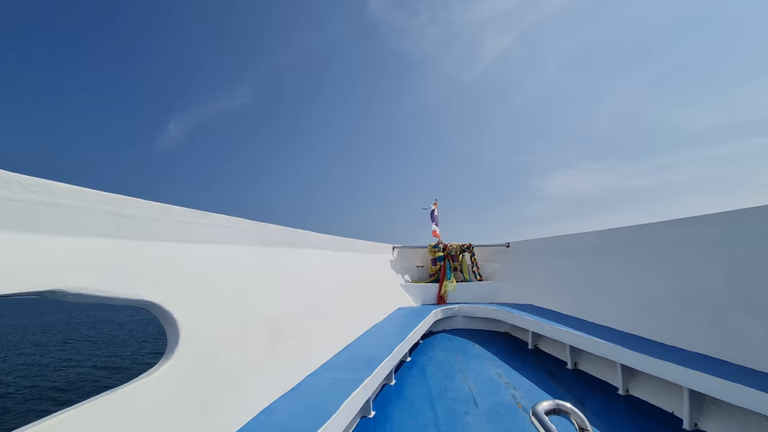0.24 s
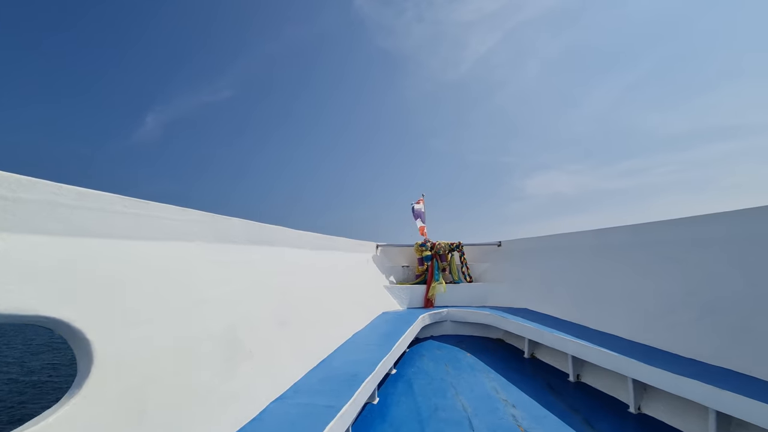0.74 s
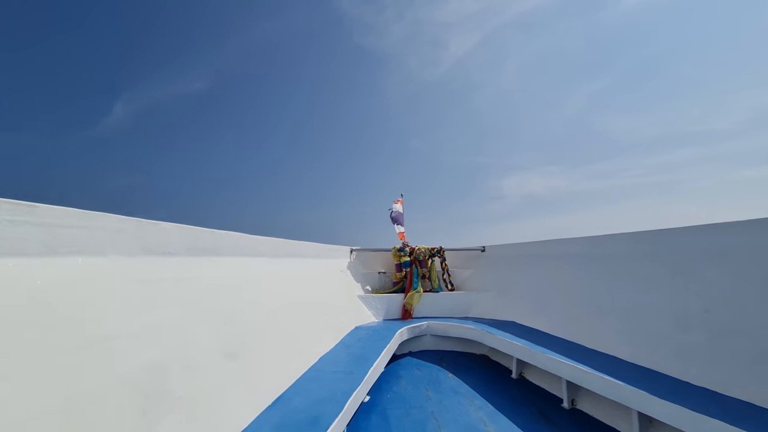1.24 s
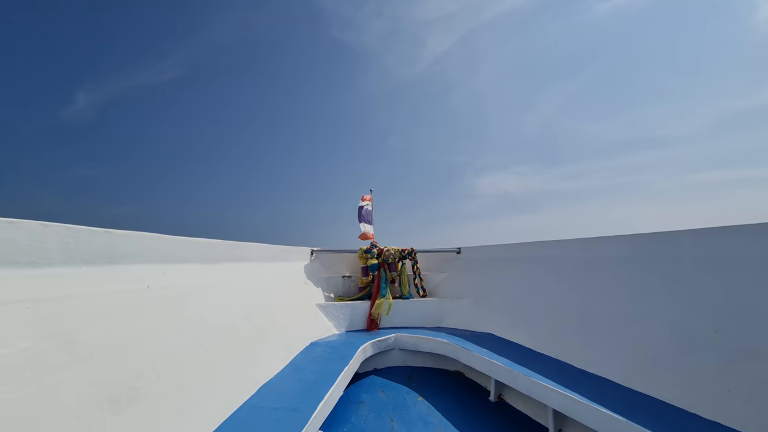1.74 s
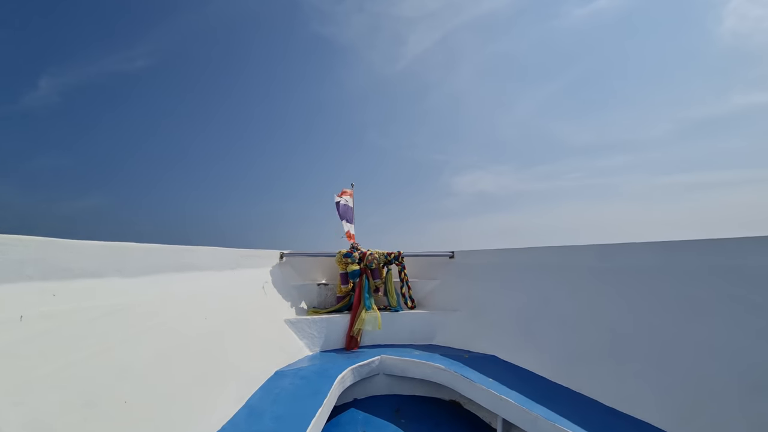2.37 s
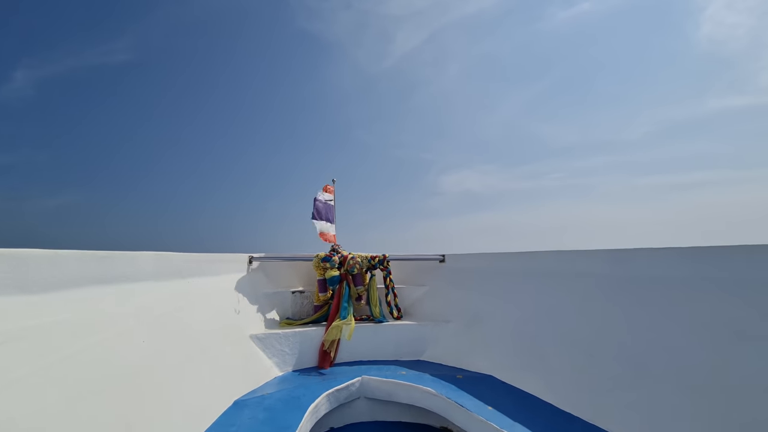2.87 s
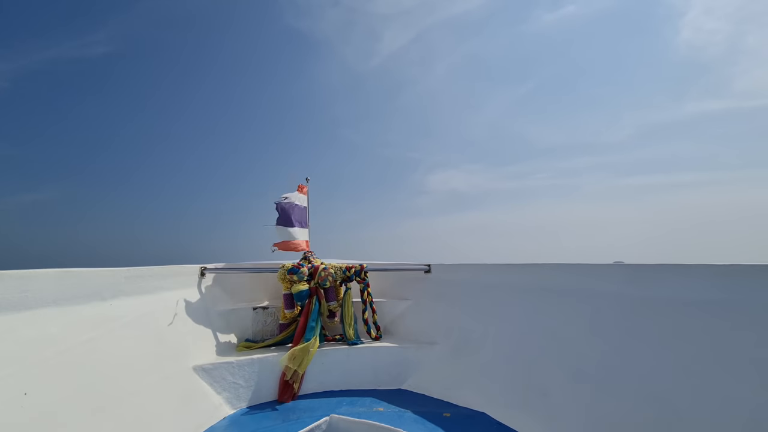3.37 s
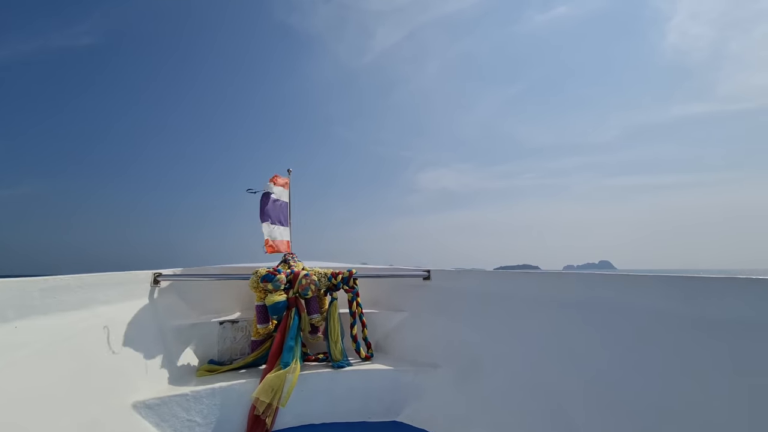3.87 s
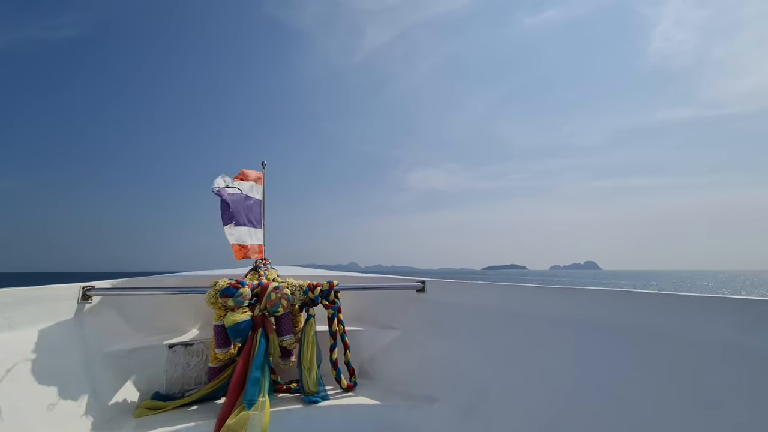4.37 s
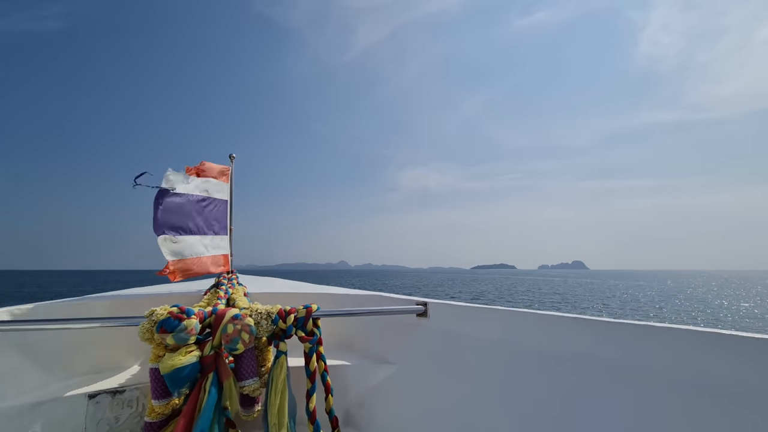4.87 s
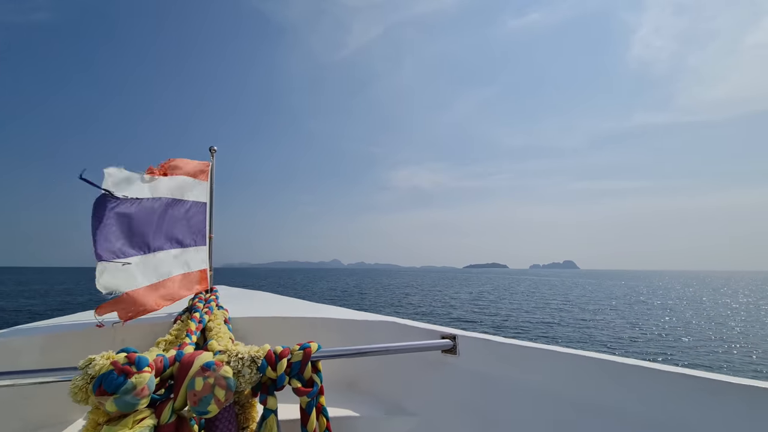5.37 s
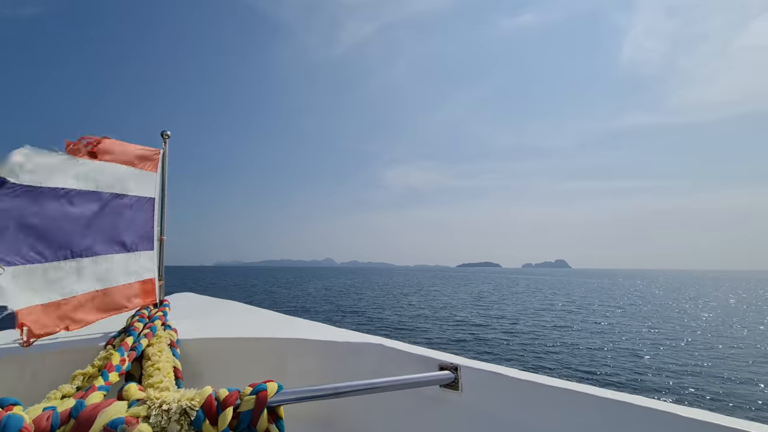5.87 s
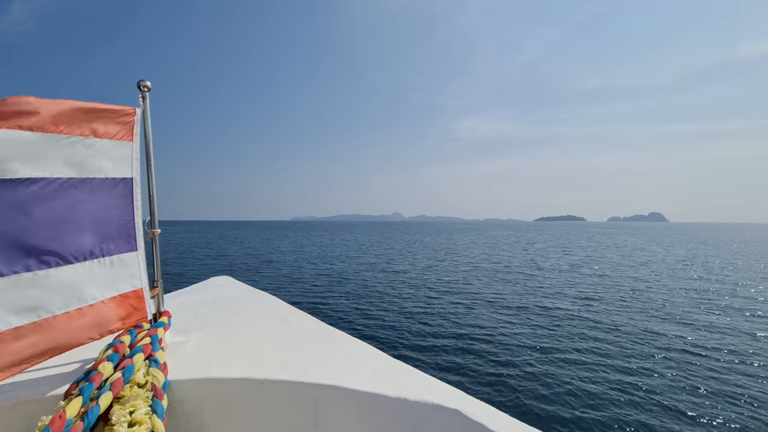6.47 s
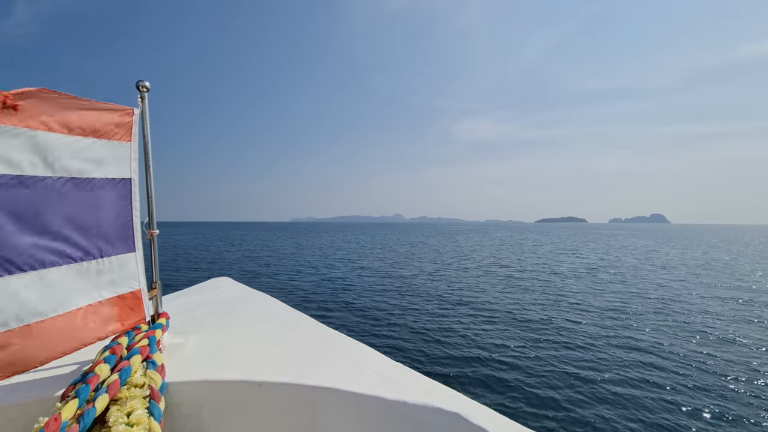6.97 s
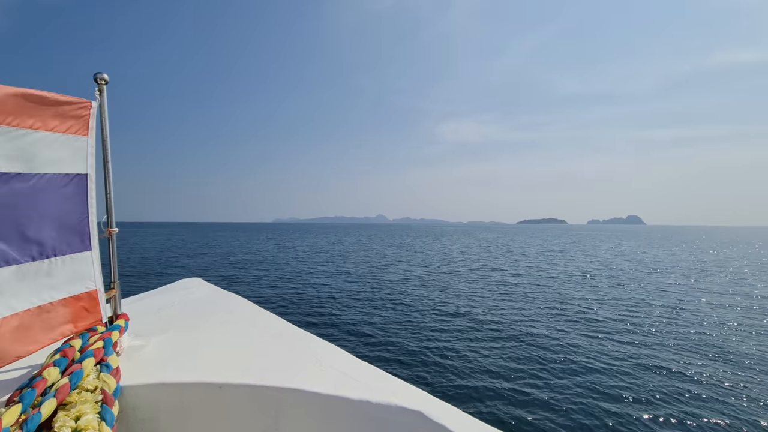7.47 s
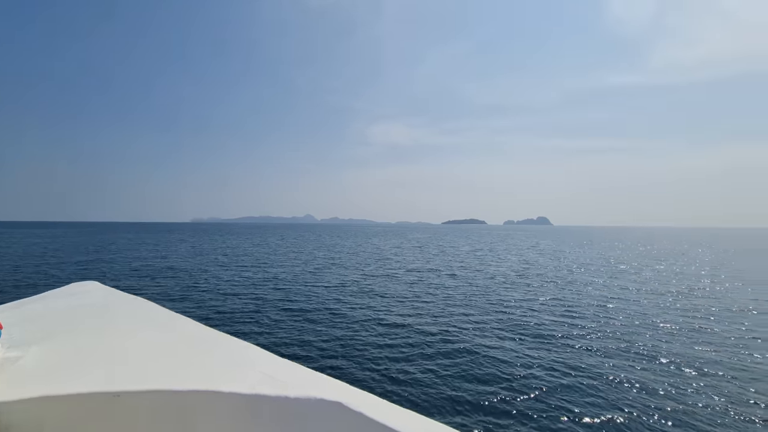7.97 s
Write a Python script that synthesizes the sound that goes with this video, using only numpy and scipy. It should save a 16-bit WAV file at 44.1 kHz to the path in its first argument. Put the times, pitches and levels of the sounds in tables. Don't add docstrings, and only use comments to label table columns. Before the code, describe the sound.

A handheld stereo microphone is carried forward along an open ferry bow. From 0 to 0.2 s wind pounds it in rough, popping thuds, uneven between left and right. Deep diesel drone continues throughout, several close tones beating and swelling, strong around 0.9 s and again from 3.8 to 5.2 s, with hull rumble and a faint high rail tone. Below, the bow wave hisses softly in surges, brighter near 2.4 s. Wind returns at 2.2 to 2.8 s, hardest at about 2.7 on the left, with another knock at 3.2. From 2.9 s a torn flag begins snapping: sharp, dry cracks and slaps, sparse then denser, especially 5 to 6.2 s, a few ringing briefly. Softer buffets pass at 4.3 and 5.3 s. At 6.3 s a bare cut jumps back to the 3.5 s passage, repeating drone, wash and flapping until about 8 s.

```python
import sys
import numpy as np
from scipy import signal
from scipy.fft import rfft, irfft, next_fast_len
from scipy.io import wavfile
from scipy.ndimage import uniform_filter1d

SR = 44100
rng = np.random.default_rng(int(sys.argv[2]) if len(sys.argv) > 2 else 0)


def unload_audio(sound):
    columns = np.transpose(np.atleast_2d(sound))
    steps = np.round(np.clip(columns, -1, 1) * 32767)
    wavfile.write(sys.argv[1], SR, steps.astype(np.int16))


def amplitude_ratio(level_db):
    exponent = np.asarray(level_db, float) / 20
    return 10 ** exponent


N = 362943
CUT, LOOP = 279869, 123480

CYCLE_HZ = [8.688, 8.918, 9.233]
LEADS = [
    (0, 6),
    (0, 9),
    (1, 12),
    (2, 38),
]
WEAK_ORDERS = [(2, 4, 0), (2, 6, 0), (0, 7, 0), (0, 8, 1), (1, 8, 1), (2, 9, 1), (0, 10, 1), (0, 11, 2),
               (1, 13, 2), (2, 14, 2), (1, 15, 2), (1, 18, 3), (2, 18, 3), (0, 21, 3), (2, 21, 3),
               (1, 24, 3), (2, 25, 3), (0, 43, 3), (0, 44, 3), (0, 45, 3), (1, 46, 3)]
WEAK_ORDERS_DB = [-25, -6.5, -21.5, -20, -4, -3, -30, -15.5, -16.5, -29.5, -47, -6.5, -4.5, -6.5, -12.5,
                  -6.5, -9, -5.5, -13, -8.5, -6.5]
# t/s, length/s, engine, order, level/dB
RESONANT_SPOTS = [(0.887, 0.14, 1, 46, -30), (1.26, 0.19, 2, 59, -38.5), (1.28, 0.52, 2, 12, -33),
                  (2.1, 0.2, 2, 18, -27.5), (4.4, 1.6, 2, 25, -43.5), (5.05, 0.24, 1, 32, -35),
                  (3.3, 4.3, 1, 135, -60), (4.82, 0.24, 2, 18, -26.5), (4.32, 0.028, 2, 30, -29),
                  (3.72, 0.072, 2, 23, -32), (3.75, 0.14, 1, 46, -33), (4.85, 0.37, 1, 46, -36.5),
                  (6.1, 0.31, 0, 44, -38), (5.33, 0.054, 1, 27, -33.5), (5.36, 0.055, 0, 44, -27),
                  (5.17, 0.11, 1, 33, -32), (4.8, 0.12, 2, 18, -37), (3.4, 0.79, 2, 18, -34.5),
                  (4.7, 0.17, 2, 31, -39.5)]


def engines():
    clock = np.arange(N // 16 + 1) * 16 / SR
    t = clock - CUT / SR
    boom_db = boom(clock)
    calm_db = uniform_filter1d(boom_db, size=SR // 32, axis=1)
    boom_db[3] = uniform_filter1d(boom_db[3], size=SR // 96)
    drift = evened(uniform_filter1d(rng.standard_normal((len(t), 2)), size=1400, axis=0)).T
    out = np.zeros((2, len(t)))
    for (engine, order), db in zip(LEADS, boom_db):
        hz = order * CYCLE_HZ[engine]
        shift = .1 + .0016 * hz
        out += amplitude_ratio(db - 1.5) * np.cos(2 * np.pi * hz * t + shift * drift)

    waver_db = 4
    hunt_turns = 0.11
    for (engine, order, lead), db in zip(WEAK_ORDERS, WEAK_ORDERS_DB):
        waver, bend = wander(len(t), 300), wander(len(t), 400)
        turns = order * CYCLE_HZ[engine] * t + rng.random() + hunt_turns * bend
        level = amplitude_ratio(calm_db[lead] + db + waver_db * waver)
        out += level * np.cos(2 * np.pi * turns + 0.35 * drift)

    blur = .012
    for s, length, engine, order, db in RESONANT_SPOTS:
        swell = np.exp(-(2 * (clock - s) / length) ** 2)
        phase = 2 * np.pi * order * CYCLE_HZ[engine] * t + blur * order * drift.sum(0)
        out += amplitude_ratio(db) * swell * np.cos(phase + 0.27 * drift)
    return np.sqrt(2) * signal.resample_poly(out, 16, 1, axis=1)[:, :N]


# t/s, level/dB
DRONE = [(0, -30.5), (.35, -24), (.6, -20.5), (.87, -15), (1.15, -18), (1.5, -31.5), (1.9, -22),
         (2.3, -23.5), (2.66, -24), (3.1, -19.5), (3.5, -24), (3.8, -13), (4.15, -13.5), (4.7, -15),
         (5.15, -15.5), (5.5, -24), (5.85, -18), (6.33, -20.5)]
LEAD_DB = [-4.5, -5, 0, -21]
LEAD_SHARE = [0.82, 0.67, 1, 0.085]
# t/s, length/s, depth level/dB
DUCKS = [(.22, 0.073, 9.5), (.73, 0.18, 13), (1.03, 0.14, 33.5), (1.72, 0.093, 10.5), (1.42, .06, -0.5),
         (2.07, 0.038, 22.5), (2.55, 0.054, 3.5), (3.02, 0.044, 5), (5.31, 0.054, 12), (2.2, 0.044, 14),
         (2.44, 0.21, 18.5), (2.87, 0.19, 29), (3.26, 0.066, 26.5), (4.32, 0.25, 9), (5.3, 0.16, 9),
         (5.67, 0.077, 13), (6.18, 0.16, 9)]
# t/s, length/s, level/dB
PANELS = [
    [(.4, 0.23, -12.5), (.64, 0.25, 8), (.9, 0.21, 5.5), (1.17, 0.14, -7.5), (1.56, 0.1, 16.5),
     (2.0, 0.27, -8), (2.8, 2.1, -12), (4.06, 0.04, -4), (4.68, 0.15, -10.5), (5.1, 0.26, 7.5),
     (5.75, 0.27, 11), (5.95, 0.094, -9), (6.3, 0.086, -13)],
    [(.4, 0.31, -5), (.64, 0.042, 14.5), (1.3, 0.25, 8), (1.91, 0.069, 13.5), (2.3, .2, -0.5),
     (3.14, 0.052, 9.5), (3.5, 0.27, -14), (3.88, 0.14, -19.5), (4.19, 0.092, 9.5), (4.4, 0.19, -36),
     (4.81, 0.031, -18.5), (5.58, 0.18, 13.5), (5.84, 0.039, 9.5), (5.93, 0.11, 10.5), (6.27, 0.056, -1)],
    [(.35, 0.027, 13), (.5, 0.018, -14), (.88, 0.058, 0.5), (1.15, 0.19, 3), (1.95, 0.084, -12),
     (2.3, 0.11, 8), (3.15, 0.068, 2.5), (3.91, 0.076, -3.5), (4.13, 0.12, 4), (5.55, .2, 2.5),
     (5.93, 0.079, -2), (6.32, 0.081, 9.5)],
]
# t/s, length/s, level/dB
RAIL = [
    (.3, 0.25, 4),
    (1.5, 0.16, -2),
    (2.037, 0.35, 3),
    (3.514, 0.13, -32),
    (4.12, 0.53, 7),
    (4.93, 0.47, 7),
    (5.495, 0.17, -3.5),
    (5.875, 0.38, 7.5),
]


def boom(t):
    middle_db = -18
    drone_db = columns(DRONE, t)[0] - middle_db
    ducks_db = bumps(DUCKS, t)
    return np.array([middle_db + db + share * (drone_db - ducks_db) + bumps(panels, t)
                     for db, share, panels in zip(LEAD_DB, LEAD_SHARE, PANELS + [RAIL])])


# f/Hz, level/dB per Hz
RUMBLE = [(12, -44), (20, 0), (97, 12), (121, 11.5), (152, -2), (205, -9), (260, -19), (340, -52),
          (570, -120)]


def rumble():
    hz, t = np.fft.rfftfreq(4096, 1 / SR), np.arange(N // 1024 + 5) * 1024 / SR
    swell_db = 10 * np.log10(np.sum(amplitude_ratio(boom(t)[:3]) ** 2, 0))
    field_db = read(RUMBLE, hz)[:, None] + 0.7 * swell_db
    return amplitude_ratio(-30) * noise(field_db, size=4096, patchy_db=6.5, flicker_db=-3.0)


# t/s, peak level/dB, thud relative level/dB, rasp relative level/dB,
# left minus right level/dB
GUSTS = [(0.013, -17.5, -0.5, -24, 13.5), (0.045, -19, 3, -27, -1), (0.067, -12, -3, -13, 2),
         (0.092, -12, 0, -25, -7), (0.128, -15, -8, -8, 3), (0.167, -14, 1, -30, -3),
         (0.186, -16, 1, -20, 0), (0.483, -23, -10, -20, 6), (0.882, -20, -15, -20, 4),
         (1.686, -21, -15, -18, -6), (2.208, -25, 10, -25, 3), (2.483, -17, 5.5, -27, 1),
         (2.618, -32, 7, -10, 5), (2.647, -15, -12, -32, 8), (2.7, -19.5, 8, -24, 15),
         (2.729, -27.5, 14.5, -31, 14.5), (2.744, -34, -4, -25, 16), (2.763, -14, 1.5, -11, -3),
         (2.804, -23, -12, -3, -3), (3.011, -27, -10, -23, -6), (3.177, -11, -9, -17, 8),
         (3.202, -11, -7, -21, -5), (3.226, -22, -1, -28, 12), (3.405, -24, 13.5, -21, -2)]


def gusts():
    out, t = np.zeros((2, N)), np.arange(5000) / SR
    for s, db, thud_db, rasp_db, pan_db in GUSTS:
        length = .02 - .0006 * (db - 1.0)
        sign, hit, size = rng.random((3, 3, len(t)))
        strength = amplitude_ratio(-3.5 * np.log(size + 0.00075))
        lumps = (hit < 1800 / SR) * np.sign(sign - .5) * strength
        ports = lumps[:2] + 0.42 * lumps[2]
        ports = ports * np.minimum(t / 0.0044, 1) * np.exp(-(t / length) ** 2)
        thud, body = band(ports, 120, 360, order=3), band(ports, 340, 680, order=3)
        rasp = band(ports, 680, 2100, order=3)
        burst = blend((thud, body, rasp), (thud_db, 0, rasp_db))
        add(out, s - .003, amplitude_ratio(db - 5.0 + sides(pan_db)) * burst)
    return out


# t/s, peak level/dB, left minus right level/dB,
# width/ms (negative for a pull)
POPS = [(0.0525, -9, -7, 0.71), (0.0719, -20.3, 20, 0.41), (0.0758, -11, 14, 0.48),
        (0.0803, -20.1, 20, -0.52), (0.0867, -17.7, 20, -0.43), (0.09, -8.5, 10, 0.36),
        (0.0999, -8, -19, 0.36), (0.1073, -11, 8, 0.6), (0.1153, -13, 8, -0.4), (0.129, -15, 17, -0.35),
        (0.1702, -16, 20, 0.46), (0.1794, -17.2, -20, 0.58), (0.1859, -15.9, 16, -0.32),
        (0.1896, -10, -8, 0.47), (0.1962, -14, -8, -0.35), (2.2137, -20.4, 20, -0.52),
        (2.2188, -22.4, -20, 0.48), (2.4094, -24.5, -20, 0.42), (2.4149, -23.6, 20, -0.3),
        (2.4326, -20.3, -6, 0.47), (2.4905, -23.5, -20, 0.49), (2.4965, -24.0, 20, 0.4),
        (2.51, -20.9, 20, 0.47), (2.5166, -22.5, -20, 0.52), (2.7051, -10, 8, 0.8), (2.7293, -4, 8, 0.9),
        (2.7437, -6.5, 8, -0.75), (2.7644, -15.1, 20, -0.28), (2.7706, -13, 16, 0.4),
        (2.7742, -20.7, -20, 0.41), (3.1784, -14.5, 12, -0.37), (3.1814, -14, 20, 0.27),
        (3.1835, -13, 8, -0.25), (3.1857, -15.9, -20, 0.3), (3.1892, -16.1, 20, 0.54),
        (3.2059, -18.7, -14, -0.58), (3.2088, -16.0, 16, 0.47), (3.2224, -14, 8, 0.45)]


def pops():
    out, t = np.zeros((2, N)), np.arange(-320, 320) / SR
    for s, db, pan_db, width in POPS:
        u = t / (.74 * abs(width) / 1000)
        push = (1 - u ** 2) * np.exp(-u ** 2 / 2)
        v = u / 2.2
        heave = amplitude_ratio(-7) * (1 - v ** 2) * np.exp(-v ** 2 / 2)
        add(out, s + t[0], np.sign(width) * amplitude_ratio(db - 4.0 + sides(pan_db)) * (push + heave))
    return out


# t/s at the middle, length/s, level/dB, left minus right level/dB,
# rasp relative level/dB
BUFFETS = [(0.082, 0.1, -14, 5.5, 4.5), (0.175, 0.046, -12.5, 3.5, 5), (0.35, 0.034, -24, 0, 5),
           (1.052, 0.069, -32, 1, 10.5), (1.65, 0.19, -26, 5, 4), (2.17, 0.057, -21.5, 11, 1),
           (2.465, 0.25, -23, 3, 2), (2.652, 0.065, -18, 1, 4), (2.762, 0.097, -19.5, 13, 3.5),
           (3.035, 0.071, -29, 3, 4.5), (3.192, 0.061, -18.5, 2, 5.5), (3.42, 0.15, -27.5, 1, 4),
           (4.312, 0.092, -22.5, 0, 2.5), (5.32, 0.068, -18.5, 5, -9), (5.658, 0.053, -25, -7, 2.5),
           (5.865, 0.054, -25, -2, -17), (2.72, 0.13, -17.5, 5, -15), (2.25, .06, -36, -2, -12),
           (5.483, 0.033, -33, 2, 7), (6.123, 0.063, -23, 2, 0), (3.59, 0.044, -32, -2, 2)]
# f/Hz, level/dB per Hz
BUFFET_COLOUR = [(15, -24), (35, 6), (150, -0.5), (420, 3), (700, -19), (1300, -25.5), (2600, -69)]


def buffets():
    a, b, both, lump_l, lump_r = rng.standard_normal((5, CUT))
    lump_s, lumpy_db, rasp_from_hz = .006, 5.5, 332
    lumps = evened(uniform_filter1d(np.array([lump_l, lump_r]), size=round(lump_s * SR), axis=1))
    air = (np.array([a, b]) + 1.35 * both) * amplitude_ratio(lumpy_db * lumps)
    size = next_fast_len(CUT)
    colour = amplitude_ratio(read(BUFFET_COLOUR, np.fft.rfftfreq(size, 1 / SR)))
    air = evened(irfft(rfft(air, size) * colour, size)[:, :CUT])
    thud, rasp = band(air, 5.7, rasp_from_hz), band(air, rasp_from_hz, 5500)
    out = np.zeros((2, N))
    for s, length, db, pan_db, rasp_db in BUFFETS:
        at = np.arange(max(round((s - length) * SR), 0), round((s + length) * SR))
        swell = amplitude_ratio(db + sides(pan_db)) * np.exp(-(2 * (at / SR - s) / length) ** 2)
        add(out, at[0] / SR, swell * (thud[:, at] + amplitude_ratio(rasp_db) * rasp[:, at]))
    return out


# t/s, crack level/dB, slap relative level/dB, sizzle relative level/dB
SNAPS = [(2.8943, -40, 6, -15), (3.1835, -36, 11, -40), (3.5088, -44, -5, -11), (3.5874, -32, -5, -8),
         (3.6723, -46, -10, -3), (3.683, -46, -11, -14), (3.697, -46, 9, -12), (3.7969, -41, 6, -9),
         (4.0496, -39, -3, -20), (4.2108, -53, 7, 5), (4.2276, -41, 7, -17), (4.2442, -58, 10, 8),
         (4.2683, -42, -10, -23), (4.3256, -33, 4, -9), (4.3634, -39, 2, -17), (4.4889, -42, -6, -20),
         (4.9063, -32, -6, -11), (4.9922, -49, 6, 4), (5.0116, -41, -1, -10), (5.0551, -35, 5, -18),
         (5.0757, -39, -5, -15), (5.1055, -32.5, 2, -24), (5.1655, -40, 5, -13), (5.1952, -56, 2, 8),
         (5.2368, -43, 5, -10), (5.3097, -40, -4, -11), (5.3918, -45, -12, -22), (5.4494, -58, 2, 7),
         (5.46, -39, -17, -10), (5.4732, -41, -14, -10), (5.4813, -40, 2, -15), (5.5359, -44, 2, -21),
         (5.5876, -44, -15, -3), (5.6105, -57, 13, 6), (5.6323, -46, -6, 4), (5.6702, -35, 3, -12),
         (5.7023, -48, 9, 2), (5.7257, -37, -5, -11), (5.9346, -35, 0, -6), (5.9431, -56, 9, 6),
         (5.9867, -46, 2, -6), (5.9971, -59, 4, 6), (6.0556, -34, 2, -10), (6.2338, -51, 3, 4),
         (6.2431, -29, -6, -6)]
# t/s, crack level/dB, slap relative level/dB, sizzle relative level/dB
MORE_SNAPS = [(3.5853, -35, -8, -6), (3.589, -34, -4, -14), (3.676, -40, -8, -2), (4.121, -44, 6, -12),
              (4.3275, -42, 6, -10), (4.369, -46, -6, -12), (5.059, -39, 2, -14), (5.2404, -44, 2, -10),
              (5.54, -45, -4, -5), (6.0525, -40, 1, -11), (6.2744, -42, 3, -10)]
# low f/Hz, high f/Hz
CRACK_SLAP_SIZZLE_HZ = [
    (1800, 4200),
    (850, 1750),
    (5200, 12500),
]


def flag(snaps):
    out, t = np.zeros((2, N)), np.arange(900) / SR
    for s, db, slap_db, sizzle_db in snaps:
        a, b, c, d, chance = rng.standard_normal((5, len(t)))
        fade = np.exp(-t / 0.00057) + 0.051 * np.exp(-t / 0.0046)
        pan_db = 1.5 * chance[0]
        echo_s, echo_db = .0031 + .0003 * chance[1], -4 + 2 * chance[2]
        direct = [a, 0.63 * a + 0.39 * b]
        echo = [c, 0.55 * c + 0.86 * d]
        for late, path_db, whip in (0, 0, direct), (echo_s, echo_db, echo):
            whip = np.array(whip) * fade - 0.38 * (t == 0)
            parts = [band(whip, lo, hi, order=3) for lo, hi in CRACK_SLAP_SIZZLE_HZ]
            snap = blend(parts, (4.5, slap_db + 3.5, sizzle_db + 5.0))
            add(out, s - .0004 + late, amplitude_ratio(db + path_db + sides(pan_db)) * snap)
    return out


# t/s, peak level/dB, pitch f/Hz
RINGS = [
    (3.588, -29, 703),
    (4.121, -28, 703),
    (4.326, -25, 1360),
    (5.053, -26.5, 870),
    (5.239, -35, 710),
    (5.479, -31, 815),
    (6.054, -32, 930),
]


def rings():
    out, t = np.zeros((2, N)), np.arange(2500) / SR
    t60 = 0.043
    for s, db, hz in RINGS:
        level = amplitude_ratio(db - 2.5 - 60 * t / t60) * np.minimum(t / 0.0011, 1)
        note = level * np.sin(2 * np.pi * hz * t)
        add(out, s, np.array([note, 0.9 * note]))
    return out


# f/Hz, level/dB per Hz
WASH = [(76, -32.5), (130, -6.5), (200, -13), (290, -13.5), (380, -11), (430, -17), (500, -19.5),
        (800, -23.5), (1400, -29), (2300, -36.5), (3200, -37.5), (4200, -45), (5500, -47), (12000, -54),
        (15800, -59)]
# t/s, hiss level/dB
SURGE = [(0, -54), (.35, -51), (.78, -51.5), (1.11, -52), (1.55, -54.5), (2.02, -48), (2.18, -49),
         (2.39, -43), (2.62, -51.5), (2.8, -47.5), (2.99, -50), (3.25, -53), (3.65, -56), (4.05, -50.5),
         (4.45, -53), (4.95, -48.5), (5.5, -55.5), (6.22, -51.5)]
# t/s, length/s, level/dB
SPRAY = [(.2, 0.11, 2.5), (.36, 0.095, 4.5), (.5, 0.062, -1), (.65, .12, 1), (.92, 0.11, 3),
         (1.13, 0.08, 4), (1.3, 0.26, 2), (1.75, 0.16, 1), (2.05, 0.26, 4), (2.72, 0.059, 1),
         (2.93, 0.11, -3), (3.35, 0.16, 3.5), (3.5, 0.11, -0.5), (3.85, 0.13, -0.5), (4.35, 0.027, 5.5),
         (4.65, 0.17, -1.5), (5.1, .1, -0.5), (5.4, 0.072, -2), (5.47, 0.029, 7.5), (5.68, 0.15, 3),
         (5.85, 0.092, 1), (6.24, 0.095, 3)]
# t/s, length/s, level/dB
BLOWN = [(.62, 0.16, 4), (3.95, 0.097, 6.5), (4.5, 0.67, -3.5), (6.05, 0.15, -5), (1.45, 0.11, 4.5),
         (2.05, .1, 3), (3.5, 0.4, -2), (3.8, 0.3, -3.5), (4.25, 0.17, 4.5), (4.7, 0.24, 3.5),
         (5.1, 0.33, 1), (5.4, 0.11, -5), (5.55, 0.095, -6.5), (5.8, 0.13, 0.5), (6.2, 0.12, 0)]
ZONE_HZ = [300, 1000, 3200, 10000]
SURGE_SHARE = [0.099, .2, .95, 1.099]
ROAR_SHARE = [0.039, 0.13, .01, .01]
BLOWN_SHARE = [0.81, 0.73, 0.11, .01]
DULLING_DB_PER_S = [0.14, -0.057, 0.14, -1.03]


def wash():
    hz, t = np.fft.rfftfreq(1024, 1 / SR), np.arange(N // 256 + 5) * 256 / SR
    surge_db = columns(SURGE, t)[0] + bumps(SPRAY, t)
    roar_db = columns(DRONE, t)[0] - bumps(DUCKS, t)
    zones_db = np.outer(SURGE_SHARE, surge_db) + np.outer(ROAR_SHARE, roar_db)
    zones_db += np.outer(DULLING_DB_PER_S, t) + np.outer(BLOWN_SHARE, bumps(BLOWN, t))
    zones_db -= zones_db[:, (t > 3.6) & (t < CUT / SR)].mean(1)[:, None]
    zones_db[:, t > CUT / SR] = 0
    shares = np.array([read(list(zip(ZONE_HZ, one)), hz) for one in np.eye(4)]).T
    field_db = read(WASH, hz)[:, None] + shares @ zones_db
    return amplitude_ratio(-29.5) * noise(field_db, size=1024, patchy_db=1.0, flicker_db=1.5)


# f/Hz, left-right likeness [0 to 1]
SAME = [(30, .7), (60, .76), (130, .86), (290, .7), (640, .7), (1300, .66), (2200, .42), (4000, .33),
        (15000, .2)]
# f/Hz, left minus right level/dB
LEAN = [(60, -0.5), (240, -1.5), (950, 1.5), (3770, 2), (15000, -2)]
# t/s, delay of the left port/s
LAG = [
    (0, .00045),
    (4.8, .00046),
    (5.1, -.0003),
    (6.4, -.00032),
]


def noise(field_db, size, patchy_db, flicker_db):
    hz = np.fft.rfftfreq(size, 1 / SR)
    a, b, c, d, patches = rng.standard_normal((field_db.shape[1], len(hz), 5)).T
    flicker = evened(uniform_filter1d(patches, size=len(hz) // 3, axis=0))
    patches = evened(uniform_filter1d(uniform_filter1d(patches, size=14, axis=0), size=10, axis=1))
    same = np.clip(read(SAME, hz), -1, 1)[:, None]
    left = a + 1j * b
    right = same * left + np.sqrt(1 - same ** 2) * (c + 1j * d)
    z = np.array([left, right])
    lag = columns(LAG, np.arange(z.shape[2]) * size / 4 / SR)[0]
    z[0] *= np.exp(-2j * np.pi * np.outer(hz, lag))
    z = z * amplitude_ratio(field_db + patchy_db * patches + flicker_db * flicker)
    z = z * amplitude_ratio(sides(read(LEAN, hz)))[:, :, None]
    return evened(signal.istft(z, nperseg=size, noverlap=size * 3 // 4)[1][:, :N])


def evened(x):
    return x / np.sqrt(np.mean(x ** 2) + 1e-20)


def wander(count, size):
    return evened(uniform_filter1d(uniform_filter1d(rng.standard_normal(count), size=size), size=size))


def read(points, hz):
    f, value = np.transpose(points)
    return np.interp(np.log(hz + 1), np.log(f + 1), value)


def columns(rows, t):
    s, *cols = np.transpose(rows)
    return np.array([np.interp(t, s, c) for c in cols])


def bumps(rows, t):
    return sum(db * np.exp(-(2 * (t - s) / length) ** 2) for s, length, db in rows)


def sides(pan_db):
    return np.array([[.5], [-.5]]) * pan_db


def blend(parts, levels_db):
    return sum(amplitude_ratio(db) * part / abs(part.mean(0)).max() for part, db in zip(parts, levels_db))


def band(x, lo_hz, hi_hz, order=2):
    return signal.sosfilt(signal.butter(order, [lo_hz, hi_hz], "band", fs=SR, output="sos"), x)


def add(mix, s, sound):
    part = mix[:, round(s * SR):][:, :sound.shape[1]]
    part += sound[:, :part.shape[1]]


def scene():
    hull = engines() + rumble()
    wind = gusts() + pops() + buffets()
    cloth = flag(SNAPS) + flag(MORE_SNAPS) + rings()
    return hull + wind + cloth + wash()


def top_cut(x):
    return signal.sosfilt(signal.butter(12, 16830, fs=SR, output="sos"), x)


def record(dry):
    lowpass = signal.firwin(1501, 15800, window=("kaiser", 9), fs=SR)
    dry = signal.oaconvolve(dry, lowpass[None], "same")
    again = dry[:, CUT - LOOP:CUT - LOOP + N - CUT]
    looped = np.concatenate([dry[:, :CUT], again], axis=1)
    return top_cut(np.clip(looped, -1, 1))


dry = scene()
out = record(dry)
unload_audio(out)
```